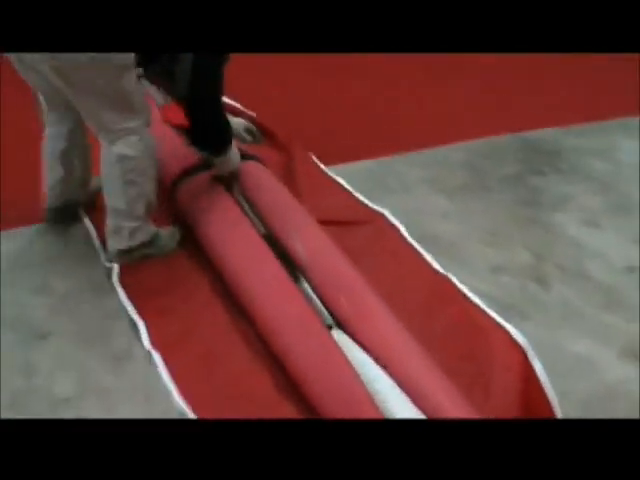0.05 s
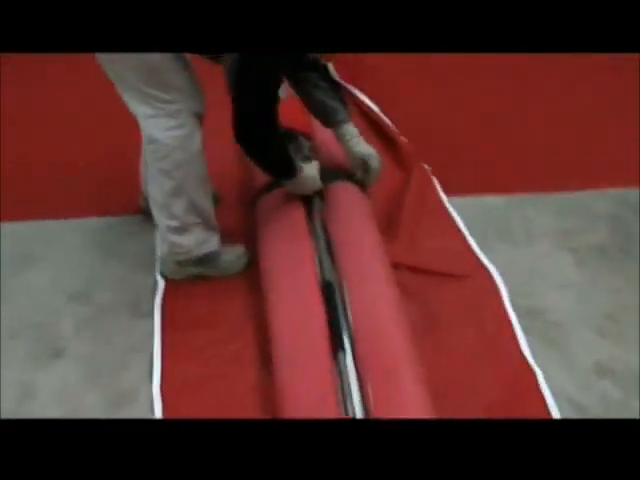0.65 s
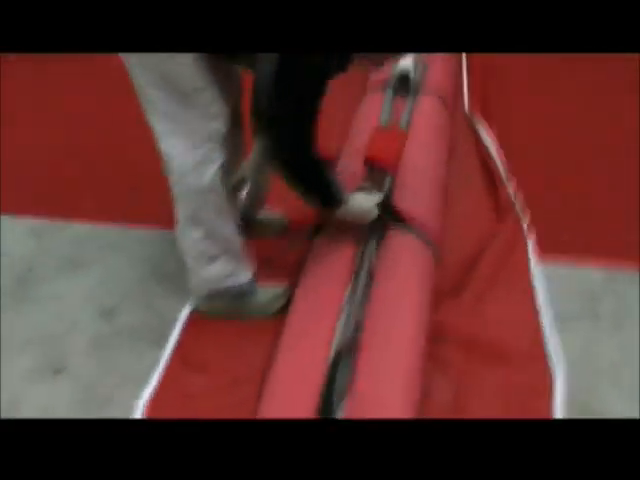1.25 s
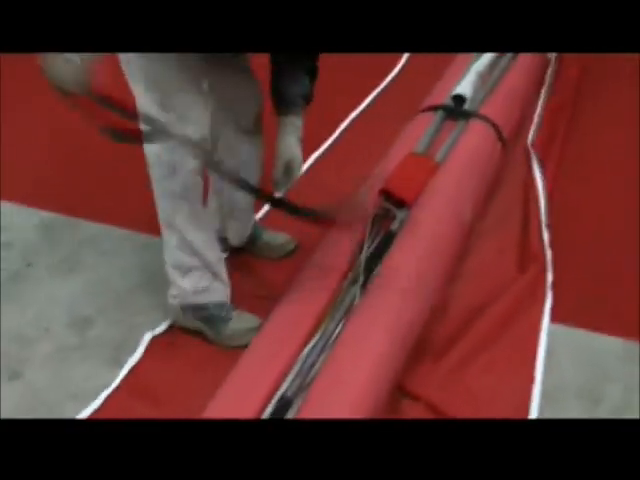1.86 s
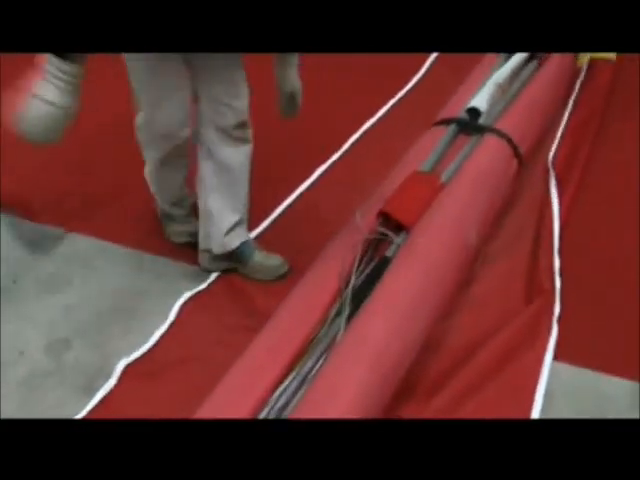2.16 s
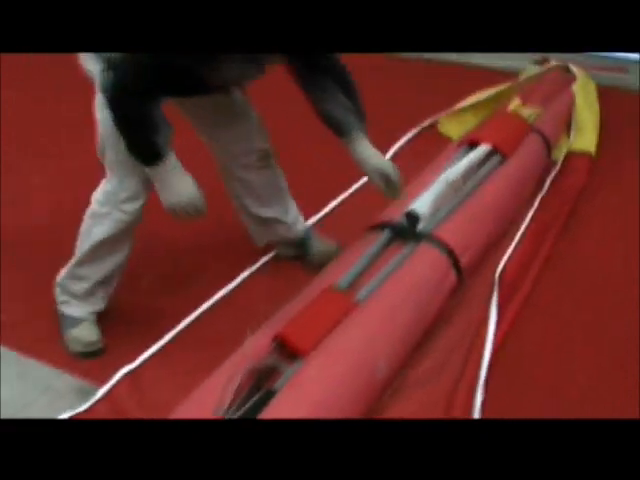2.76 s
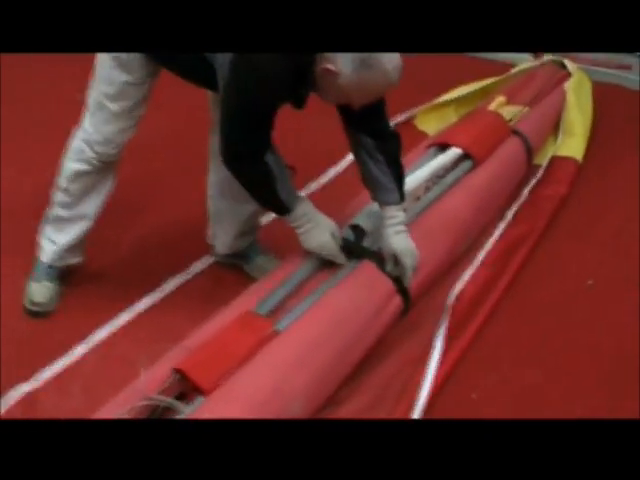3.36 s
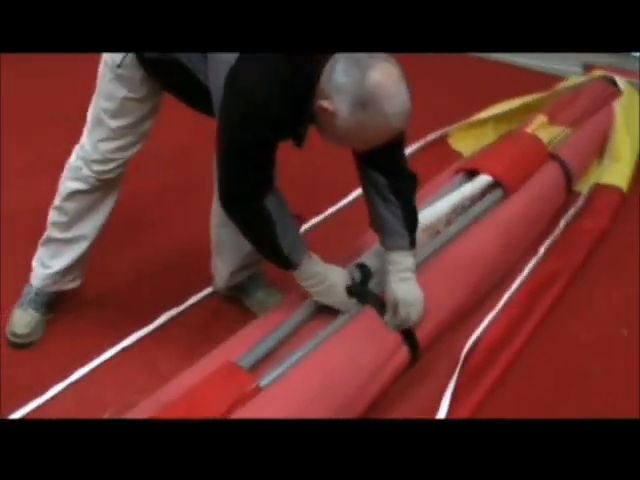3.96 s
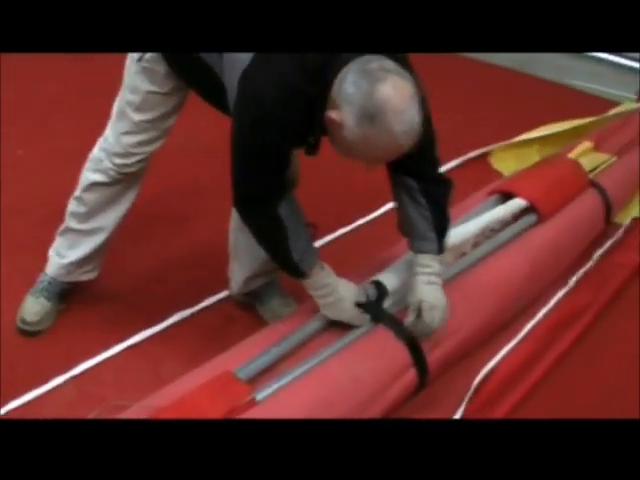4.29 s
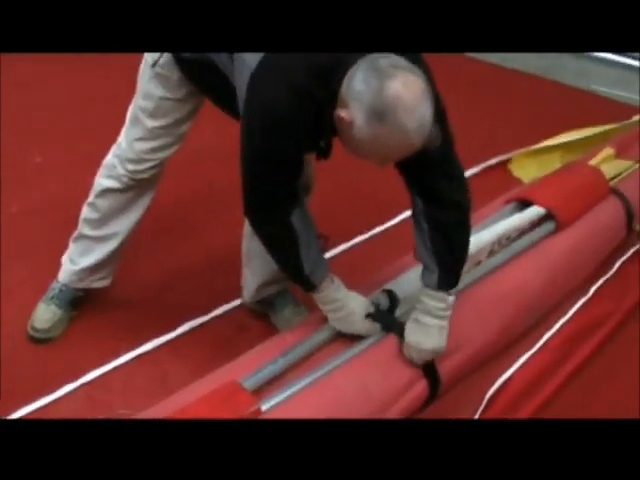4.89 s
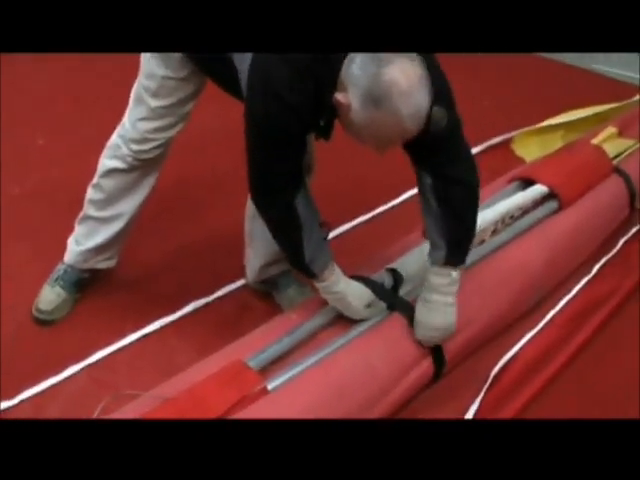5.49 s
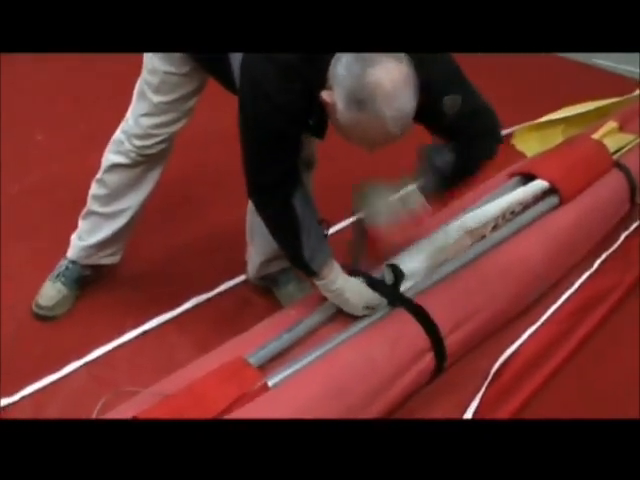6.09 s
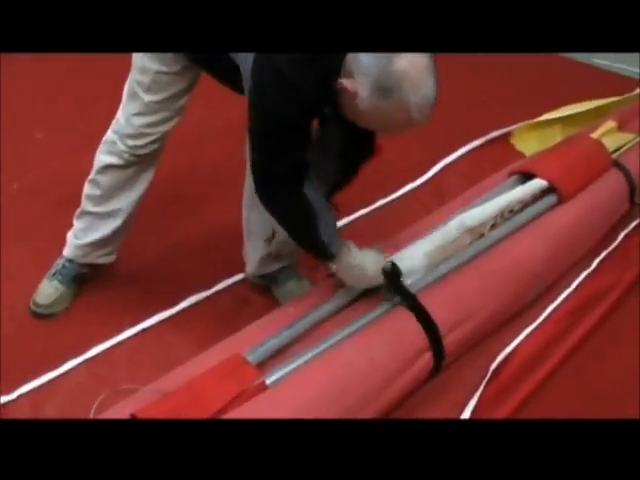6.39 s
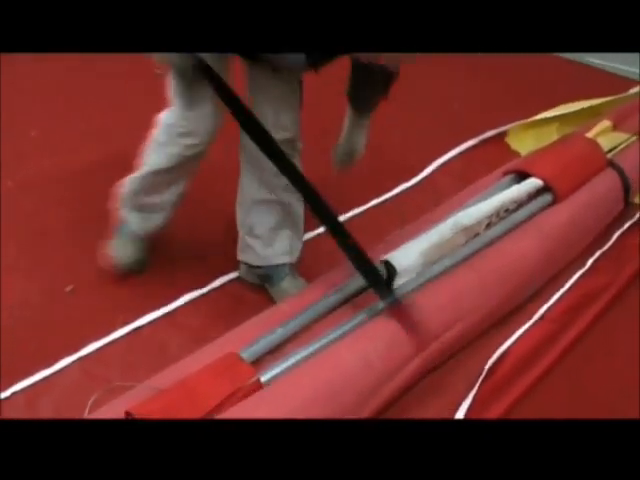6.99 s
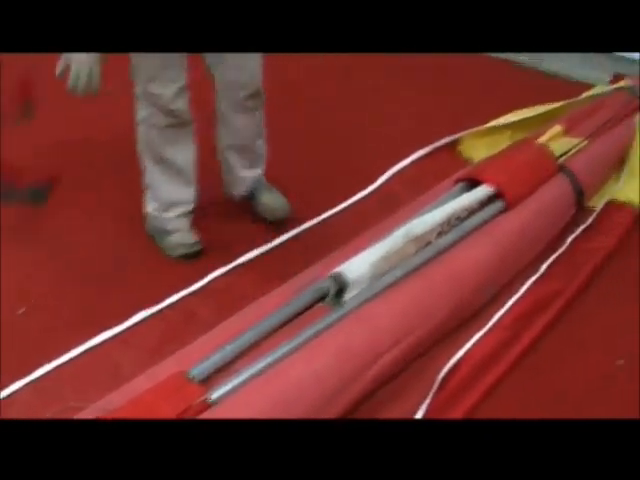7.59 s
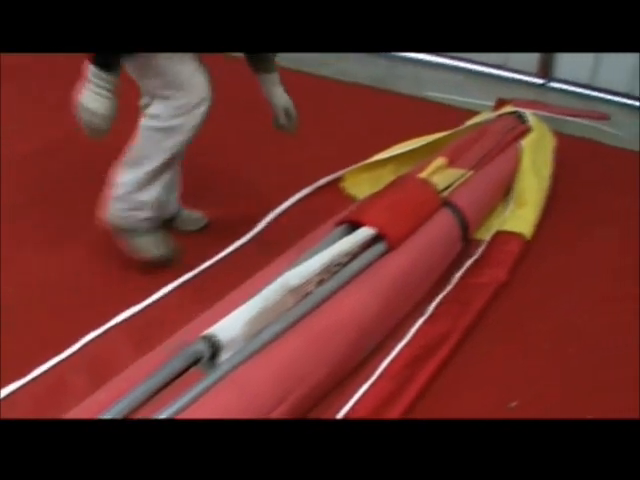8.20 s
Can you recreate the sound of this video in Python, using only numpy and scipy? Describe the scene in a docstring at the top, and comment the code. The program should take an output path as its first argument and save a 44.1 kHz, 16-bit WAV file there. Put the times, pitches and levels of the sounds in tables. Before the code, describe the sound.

Two hook-and-loop straps rip open and rasp through buckles in a large echoing hangar, with fittings clacking, cloth rustling and soft footsteps.

```python
"""A worker undoes two hook-and-loop straps on a folded glider wing in a large hangar.
An earlier sound fades in the hall and shoes scuff on carpet; the first strap is picked at and rips open,
its hooks letting go as dense clicks. Its webbing rasps through the buckle and is tossed aside; fittings
clack and cloth rustles. The second strap is picked at, ripped open near 6 s, drawn out with a buzz and
tossed aside. A faint low hum sets in near the end. Throughout, the hall reverberates."""
import sys
import numpy as np
from scipy import signal
from scipy.fft import rfft, irfft
from scipy.io import wavfile

SR = 44100
rng = np.random.default_rng(int(sys.argv[2]) if len(sys.argv) > 2 else 0)


def unload_wav(signal):
    """Save mono or channel-first audio to the path in sys.argv[1] as 16-bit WAV at rate SR, clipped to [-1, 1]."""
    wavfile.write(
        sys.argv[1],
        SR,
        np.round(np.clip(np.atleast_2d(signal).T, -1, 1) * 32767).astype(np.int16),
    )


N = 363813


def amp(db):
    """Amplitude ratio of a level in decibels."""
    return 10 ** (np.asarray(db) / 20)


def unit(x):
    """Normalisation to an rms of one."""
    return x / np.sqrt(np.mean(x ** 2) + 1e-20)


def read(points, hz):
    """Interpolation of (frequency, value) points on a logarithmic frequency axis."""
    f, value = np.transpose(points)
    return np.interp(np.log(hz + 1), np.log(f + 1), value)


def add(mix, start_s, sound):
    """Superposition: a sound joins the mix at its start time."""
    part = mix[max(round(start_s * SR), 0):][:len(sound)]
    part += sound[:len(part)]


def colour(x, points, size=2048):
    """Minimum-phase filtering: the spectrum is shaped while clicks keep their sharp fronts."""
    log_gain = np.log(amp(read(points, abs(np.fft.fftfreq(size, 1 / SR)))))
    taps = np.fft.ifft(np.exp(np.conj(signal.hilbert(log_gain)))).real
    return signal.oaconvolve(x, taps[:size // 2])[:len(x)]


def resonate(x, hz, width_hz):
    """A damped resonance of unit gain whose frequency may move."""
    phasor = np.exp(2j * np.pi * np.cumsum(hz * np.ones(len(x))) / SR)
    pole = np.exp(-np.pi * width_hz / SR)
    return 2 * (phasor * signal.lfilter([1 - pole], [1, -pole], x / phasor)).real


def grains(count, per_s, spread_db):
    """Shot noise: random impulses of either sign, many small and a few large."""
    chance, size, sign = rng.random((3, count))
    size_db = spread_db * np.minimum(-np.log(size + 1e-12), 3)
    return unit((chance < per_s / SR) * amp(size_db) * np.sign(sign - .5))


def waver(count, per_s):
    """Random modulation: straight lines between Gaussian values."""
    knots = rng.standard_normal(4096)
    return np.interp(np.arange(count) * per_s / SR, np.arange(len(knots)), knots)


def stroke(length_s, crest, sag_db, fade_s):
    """Envelope of a movement: it peaks at the fraction crest of its length and sags to faded ends."""
    t = np.arange(0, length_s, 1 / SR)
    from_crest = np.interp(t / length_s, [0, np.clip(crest, .02, .98), 1], [-1, 0, 1])
    edges = np.clip(np.minimum(t, length_s - t) / fade_s, 0, 1)
    return edges * amp(-sag_db * from_crest ** 2)


def air(level_db=-57, drift_db=2.8):
    """Ambient noise: the low murk of the hall, drifting in level."""
    # frequency_hz, gain_db
    spectrum = [(15, -37), (30, -12.5), (65, 3.5), (130, -4), (200, 0), (450, -6), (800, -10),
                (1500, -15.5), (3500, -22), (9000, -24), (16000, -33.5)]
    wash = unit(colour(rng.standard_normal(N), spectrum, size=8192))
    return wash * amp(level_db + drift_db * waver(N, per_s=6))


def hum(start_s=7.8, pitch_hz=52, level_db=-68, flutter_db=2):
    """Frequency and amplitude modulation make a faint low tone waver."""
    out = np.zeros(N)
    cycles = np.cumsum(pitch_hz + 2 * waver(N, per_s=7.74)) / SR
    gain = amp(level_db + flutter_db * waver(N, per_s=6))
    add(out, start_s, gain * unit(np.sin(2 * np.pi * cycles)))
    return out


def hall(x, wet_db, build_s=0.0018):
    """Reverberation: dense echoes decay exponentially, and air absorption takes the treble first."""
    # frequency_hz, t60_s
    decay_times = [(100, 1), (500, 2.2), (1500, 2.2), (3000, 1.38), (5000, 1.15), (8000, 0.83),
                   (13000, 0.58)]
    # frequency_hz, gain_db
    spectrum = [(60, -8), (200, 8), (1000, 1), (3000, 3), (6000, 2.5), (10000, -2), (16000, -0.5)]
    hz, t, bands = signal.stft(rng.standard_normal(2 * SR), SR, nperseg=256)
    band_db = read(spectrum, hz)[:, None] - 60 * t / read(decay_times, hz)[:, None]
    bands *= amp(band_db) * (1 - np.exp(-t / build_s))
    tail = signal.istft(bands, SR, nperseg=256)[1]
    return amp(wet_db) * signal.fftconvolve(x, tail / np.linalg.norm(tail))[:N]


def diffuse_field(sound, bursts):
    """Reflections add incoherently: the sound and each burst of clacks excite their own tails."""
    return hall(sound, wet_db=-7) + sum(hall(burst, wet_db=-14) for burst in bursts)


def grain_swells(swells, spectrum, gain_db, sag_db, per_s, spread_db, waver_db):
    """Modulated shot noise: fine impulses swell and fade, as when fibres catch and slip."""
    envelope = np.zeros(N)
    for start_s, length_s, crest, level_db in swells:
        add(envelope, start_s, amp(level_db + gain_db) * stroke(length_s, crest, sag_db, fade_s=.015))
    texture = grains(N, per_s, spread_db) * amp(waver_db * waver(N, per_s=25))
    return envelope * unit(colour(texture, spectrum))


def tail_and_scuffs():
    """The hall's fading tail of an earlier sound, then the friction of soles and trouser legs."""
    # the tail first, then the scuffs: start_s, length_s, crest_fraction, level_db
    swells = [(0.0, 0.51, 0.017, -43.5), (1.8, 0.4, 0.32, -43.5), (2.2, 1.37, 0.18, -49.5),
              (3.6, 0.26, 0.84, -55), (4.6, 0.5, 0.91, -55), (7.3, 1.3, 0.46, -56.5)]
    # frequency_hz, gain_db
    spectrum = [(100, -7), (200, 1), (550, 0.5), (1100, 4), (1700, 2.5), (2400, 0), (3500, -9),
                (9000, -14.5)]
    return grain_swells(swells, spectrum, gain_db=-6, sag_db=9.5, per_s=3000, spread_db=2.5, waver_db=2.5)


def cloth():
    """Uneven friction: clothes and wing cover swish as the arms move."""
    # start_s, length_s, crest_fraction, level_db
    moves = [(0.1, 0.39, 0.9, -58), (0.425, 0.57, 0.1, -53), (1.82, 0.16, 0.74, -43.5),
             (2.18, 0.071, 0.62, -49), (2.28, 0.11, 0.38, -43), (2.42, 0.18, 0.35, -48),
             (2.55, 0.38, 0.2, -45), (3.1, 0.23, 0.82, -49), (3.47, 0.24, 0.25, -51.5),
             (3.79, 0.28, 0.75, -46.5), (4.53, 0.31, 0.45, -54.5), (4.86, 0.15, 0.76, -64),
             (5.63, 0.14, 0.36, -56.5), (7.03, 0.038, 0.2, -36), (7.1, 0.082, 0.25, -58),
             (7.29, 0.19, 0.46, -53.5), (7.79, 0.52, 0.3, -66)]
    # frequency_hz, gain_db
    spectrum = [(120, -25), (200, -6), (509, -3), (601, -42), (696, -3.5), (883, -6), (968, -6.5),
                (1710, -6), (3370, -6.5), (9580, -7), (16000, -16)]
    return grain_swells(moves, spectrum, gain_db=-1, sag_db=10, per_s=5000, spread_db=5, waver_db=5.5)


def thumps(gain_db=1, rise_s=0.0017):
    """Cushioned impacts: footfalls on carpet and bumps on the padded wing carry little treble."""
    # start_s, peak_db, t60_s
    blows = [(0.214, -36, 0.033), (1.303, -41, 0.092), (1.905, -40, 0.038), (2.33, -44.5, 0.065),
             (2.618, -44.5, 0.069), (3.256, -42, 0.41), (4.268, -41.5, 0.044), (5.04, -44, 0.07),
             (5.967, -30, 0.11), (6.099, -27.5, 0.35), (6.726, -27.5, 0.068), (6.948, -39, 0.13)]
    # frequency_hz, gain_db
    spectrum = [(40, -9), (90, -8.5), (180, 10.5), (300, -6), (550, 0.5), (1500, -30), (5000, -63)]
    out, t = np.zeros(N), np.arange(12000) / SR
    for start_s, peak_db, t60_s in blows:
        envelope = (1 - np.exp(-t / rise_s)) * amp(-60 * t / t60_s)
        blow = colour(rng.standard_normal(len(t)) * envelope, spectrum)
        add(out, start_s, amp(peak_db + gain_db) * blow / abs(blow).max())
    return out


def clacks(tick_gain_db=-2, crack_gain_db=2, knock_gain_db=8, ring_db=6, graze_s=0.0005, t60_s=0.041):
    """Hard impacts: buckles and fittings graze, meet with a tick, then chatter over a damped ring."""
    # contact_s, tick_db, ring_hz, crack_db, knock_db
    impacts = [(0.216, -45, 900, -55, -56), (0.427, -25, 2130, -39.5, -45.5), (0.496, -45, 636, -46, -48.5),
               (1.382, -16, 1450, -36, -42.5), (1.518, -24, 1940, -31.5, -30),
               (1.976, -17, 1570, -56, -45.5), (2.058, -34, 2210, -41.5, -38.5),
               (2.07, -48, 830, -42, -38.5), (2.313, -28, 1530, -45, -43), (2.425, -9.5, 1740, -23.5, -39),
               (2.573, -4, 1610, -40.5, -34), (2.603, -24, 1450, -35, -57), (2.622, -5, 1600, -47.5, -40),
               (2.757, -26, 1620, -54, -42), (5.013, -19, 1290, -55, -44), (6.901, -4, 1600, -36, -34.5),
               (7.339, -39, 1050, -45.5, -42), (7.771, -13.5, 1100, -34.5, -41.5),
               (7.896, -38, 700, -54, -51)]
    # bright tick and crack: frequency_hz, gain_db
    crack_spectrum = [(1500, -20.5), (3800, 5), (5300, 1), (7000, 0.5), (10500, 5), (12500, -7),
                      (16000, -8)]
    # dull knock: frequency_hz, gain_db
    knock_spectrum = [(120, -31), (400, -3.5), (1700, -2.5), (3000, -3), (5000, -5), (12000, -64)]
    out, t = np.zeros(N), np.arange(-300, 6000) / SR  # contact at t = 0
    tick = colour(1. * (t == 0), crack_spectrum)
    envelope = amp(-60 * np.maximum(t, 0) / t60_s) * np.exp(np.minimum(t, 0) / graze_s)
    envelope_rms = np.sqrt(np.mean(envelope ** 2))
    for contact_s, tick_db, ring_hz, crack_db, knock_db in impacts:
        chatter = envelope * grains(len(t), per_s=20000, spread_db=1.5)
        crack = amp(crack_db + crack_gain_db) * unit(colour(chatter, crack_spectrum))
        body = colour(chatter, knock_spectrum)
        body += amp(ring_db) * resonate(body, ring_hz, width_hz=550)
        knock = amp(knock_db + knock_gain_db) * unit(body)
        dull_db = min(crack_db - knock_db, 0)  # a dull knock has little tick
        contact = amp(tick_db + tick_gain_db + dull_db) * tick / abs(tick).max()
        add(out, contact_s + t[0], contact + envelope_rms * (crack + knock))
    return out


def buzzes(gain_db=-4, width_hz=750):
    """Narrow-band friction noise: a shoe scuff and rubbing webbing each give a fuzzy tone."""
    # the shoe first, then the webbing: start_s, length_s, crest_fraction, level_db, buzz_hz
    rubs = [(2.59, 0.24, 0.41, -43.5, 1630), (4.22, 0.24, 0.73, -43.5, 1950),
            (6.562, 0.43, 0.45, -33, 2100), (7.339, 0.17, 0.28, -53.5, 1500)]
    out = np.zeros(N)
    for start_s, length_s, crest, level_db, buzz_hz in rubs:
        rub = stroke(length_s, crest, sag_db=7, fade_s=0.011)
        band = resonate(rng.standard_normal(len(rub)), buzz_hz, width_hz)
        buzz = resonate(band, buzz_hz, width_hz)
        add(out, start_s, rub * amp(level_db + gain_db) * unit(buzz))
    return out


def balance(x, treble_db, body_db, crossover_hz=3500):
    """A crossover splits treble from body so that each takes its own rms level."""
    body = signal.sosfiltfilt(signal.butter(4, crossover_hz, fs=SR, output="sos"), x)
    return amp(treble_db) * unit(x - body) + amp(body_db) * unit(body)


def slides(beam, treble_gain_db=-6, body_gain_db=-1.5, catch_db=1.33):
    """Stick-slip friction: webbing rasps over the buckle bar and drives the buckle's resonances."""
    # one list of pulls a slide: start_s, length_s, crest_fraction, treble_db, body_db
    slide_pulls = [
        [(1.265, 0.6, 0.46, -30, -38)],
        [(4.161, 0.32, 0.36, -41, -44)],
        [(6.495, 0.425, 0.7, -23, -33.5), (6.85, 0.225, 0.31, -19, -34.5)],
    ]
    # one list a slide: frequency_hz, gain_db
    spectra = [
        [(59, -15), (100, -12), (197, -1.5), (302, -6), (335, -3.5), (433, -7), (784, 1), (910, -10), (1100, 3),
         (1330, -4.5), (2000, -2.5), (4110, -13.5), (4570, -17.5), (10000, -9.5), (16000, -16.5)],
        [(59, -28), (100, -15), (174, -2), (365, -12.5), (389, -4), (461, -9), (1800, -5), (1950, -7.5),
         (2990, -9), (9210, 0), (16000, -12)],
        [(59, -20), (100, -6.5), (135, -13), (197, -3.5), (302, -9), (524, -5), (818, -4.5), (891, -4),
         (2130, -5), (4110, -1.5), (4770, -1.5), (6990, 1.5), (10000, 7.5), (15000, 4), (16000, -25)],
    ]
    # frequency_hz, width_hz, gain_db
    buckle_modes = [(788, 19, 2.5), (2990, 290, 2), (4650, 310, 8.5), (5500, 1400, 8.5), (10200, 1600, -9)]
    out = np.zeros(N)
    for pulls, spectrum in zip(slide_pulls, spectra):
        for start_s, length_s, crest, treble_db, body_db in pulls:
            pull = stroke(length_s, crest, sag_db=14, fade_s=.05)  # the hand speeds up, then slows
            rasp = grains(len(pull), per_s=14000, spread_db=3.5)
            rasp *= amp(catch_db * waver(len(pull), per_s=260))
            ring = sum(amp(db) * resonate(rasp, hz, width_hz) for hz, width_hz, db in buckle_modes)
            strap = colour(rasp + beam * ring, spectrum)
            add(out, start_s, pull * balance(strap, treble_db + treble_gain_db, body_db + body_gain_db))
    return out


def picking(crackle_gain_db=-3, strays_per_s=70, stray_over_db=14, stray_spread_db=6):
    """Elastic release: single hooks let go with a tick and a shiver of the tape, over a fine crackle."""
    # fingers tugging at the hooks: start_s, length_s, level_db
    tugs = [(0.685, 0.031, -39.5), (3.901, 0.21, -52.5), (4.09, 0.1, -42), (4.857, 0.2, -49),
            (5.754, 0.19, -44.5)]
    # prominent single hooks: start_s, peak_db
    loud_snaps = [(0.648, -32), (0.693, -34), (3.311, -29), (4.092, -23.5), (4.126, -20.5), (4.195, -23),
                  (4.518, -27.5), (4.828, -32), (4.85, -31.5), (4.888, -22.5), (5.014, -28), (5.752, -33),
                  (5.89, -23), (5.902, -22), (5.918, -22), (5.941, -14)]
    # frequency_hz, gain_db
    spectrum = [(120, -28), (200, 0), (254, -9), (311, -19.5), (538, 1.5), (851, -15.5), (1100, -2),
                (1590, -7), (2860, -2.5), (4270, -7), (4770, 1), (7410, -7.5), (8580, -4), (11500, -6),
                (16000, -21.5)]
    out, strays = np.zeros(N), []
    for start_s, length_s, level_db in tugs:
        tug = stroke(length_s, crest=0.17, sag_db=2.5, fade_s=0.0007)
        crackle = colour(grains(len(tug), per_s=1300, spread_db=3), spectrum)
        add(out, start_s, tug * amp(level_db + crackle_gain_db) * unit(crackle))
        for slot, (late, size) in enumerate(rng.random(size=(32, 2))):
            delay_s = (slot + late) / strays_per_s
            if delay_s < length_s:
                peak_db = level_db + stray_over_db + stray_spread_db * (2 * size - 1)
                strays.append((start_s + delay_s, peak_db))
    t = np.arange(1024) / SR
    for start_s, peak_db in loud_snaps + strays:
        shiver = .22 * rng.standard_normal(len(t)) * np.exp(-t / .0014)
        snap = colour((t == 0) + shiver, spectrum)
        add(out, start_s, amp(peak_db) * snap / abs(snap).max())
    return out


def rips(beam, treble_gain_db=-.5, body_gain_db=-1, clump_db=0.96, ring_db=6, catch_s=0.013):
    """Shot noise of tearing hooks thickens with the pull, while tension raises the strap's ring."""
    # start_s, length_s, crest_fraction, treble_db, body_db, mean_ring_hz
    tears = [(0.706, 0.037, 0.45, -27.5, -31.5, 5300), (0.737, 0.19, 0.95, -24, -27, 5150),
             (5.003, 0.09, 0.15, -50.5, -47, 5150), (5.935, 0.196, 0.58, -21.5, -25, 5300)]
    # one list a rip: frequency_hz, gain_db
    spectra = [
        [(53, -54), (90, -3), (2090, -1), (4170, -14), (5300, -10), (5780, -14), (10100, -9), (16000, -17)],
        [(53, -54), (90, -20), (260, 1), (296, -5), (786, -3.5), (876, -4), (2230, -5.5), (3910, -6),
         (4750, -3), (10100, 1), (16000, -7)],
        [(53, -41), (90, -7), (284, -14), (457, -8), (786, -16), (2830, -19.5), (9510, -2), (16000, -17)],
        [(53, -65), (90, -34), (234, -2), (310, -9.5), (532, -4.5), (1750, -8), (2830, -5), (4080, -10),
         (6030, -8.5), (12600, -6), (16000, -18.5)],
    ]
    # one list a rip: frequency_hz, width_hz, gain_db
    strap_modes = [
        [(800, 200, -4), (2000, 400, -2)],
        [(780, 160, -3), (1060, 120, -6), (2000, 350, -3)],
        [(2200, 350, -3)],
        [(1120, 300, 0), (2700, 380, 2), (8800, 600, -6)],
    ]
    out = np.zeros(N)
    for tear, spectrum, modes in zip(tears, spectra, strap_modes):
        start_s, length_s, crest, treble_db, body_db, mean_ring_hz = tear
        pull = stroke(length_s, crest, sag_db=8, fade_s=.001)
        pull *= 1 - np.exp(-np.arange(len(pull)) / SR / catch_s)
        hooks = grains(len(pull), per_s=26000 * pull, spread_db=2)
        hooks *= amp(clump_db * waver(len(pull), per_s=320))
        freed = amp(np.linspace(-7, 3, len(pull)))  # the modes grow louder as the strap comes free
        modal_ring = freed * sum(amp(db) * resonate(hooks, hz, width_hz) for hz, width_hz, db in modes)
        taut_hz = mean_ring_hz * (1 + 0.26 * (pull - pull.mean()))
        taut_ring = amp(ring_db) * resonate(hooks, taut_hz, width_hz=750)
        strap = colour(hooks + beam * (modal_ring + taut_ring), spectrum)
        strap = balance(strap, treble_db + treble_gain_db, body_db + body_gain_db)
        add(out, start_s, np.sqrt(pull * pull.mean()) * strap)
    return out


def scene(lead_samples=0.14):
    """Coherence at two close microphones: direct sound is nearly alike in both, the hall less so."""
    # diffuse sound: frequency_hz, side_against_mid_db
    stereo_width = [(40, -19), (200, -25), (700, -14.5), (1400, -17.5), (2800, -10), (5500, -3), (9000, -6),
                    (14000, 6)]
    soft = picking() + thumps() + cloth() + tail_and_scuffs()
    bursts = [clacks() for _ in range(3)]  # a clack throws a different burst in each direction
    # directivity: beam weights the resonances, strong in one direction and weaker over the others
    direct = soft + rips(beam=1) + slides(beam=1) + buzzes() + bursts[0]
    radiated = soft + rips(beam=.3) + slides(beam=.3) + .6 * buzzes()
    mid = direct + diffuse_field(radiated, bursts) + air() + hum()
    # direct sound reaches the left microphone slightly early, so the difference is its slope
    side = lead_samples * np.gradient(direct)
    side += colour(diffuse_field(radiated, bursts) + air(), stereo_width)
    return np.array([mid + side, mid - side])


def record(dry, cutoff_hz=16050):
    """Frequency response: the microphones differ slightly in sensitivity, and a low-pass follows."""
    # frequency_hz, left_minus_right_db
    mismatch = [(1500, 0), (2500, -0.1), (4400, -2.4), (8000, 0.1), (13000, -0.2)]
    tilt_db = read(mismatch, np.fft.rfftfreq(N, 1 / SR)) / 2
    heard = irfft(rfft(dry) * amp([tilt_db, -tilt_db]), N)
    low_pass = signal.firwin(511, cutoff_hz, window=("kaiser", 9), fs=SR)
    return signal.oaconvolve(heard, low_pass[None], "same")


dry = scene()
out = record(dry)
unload_wav(out)
```